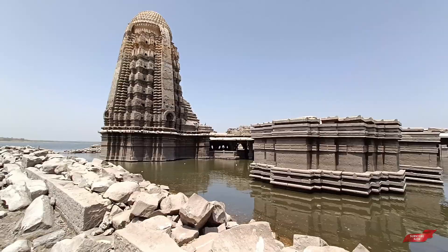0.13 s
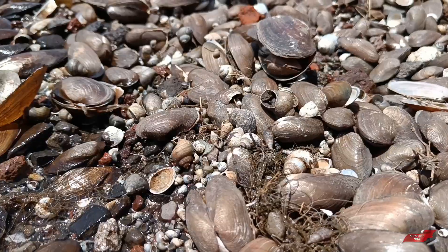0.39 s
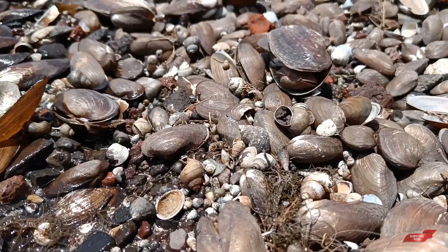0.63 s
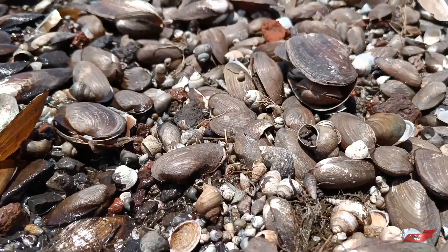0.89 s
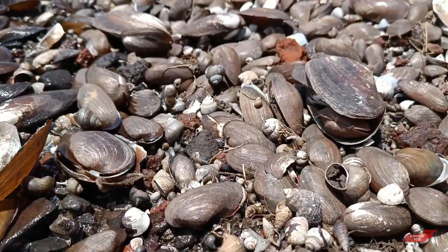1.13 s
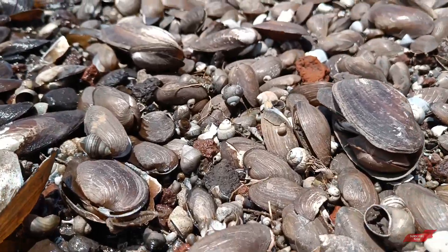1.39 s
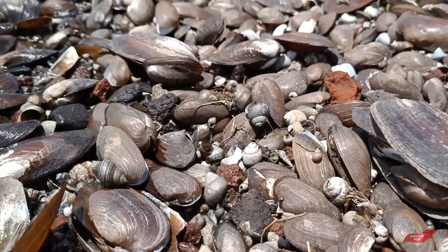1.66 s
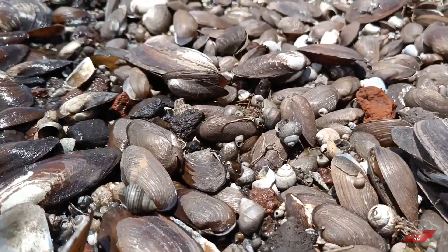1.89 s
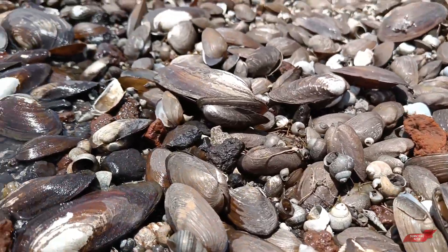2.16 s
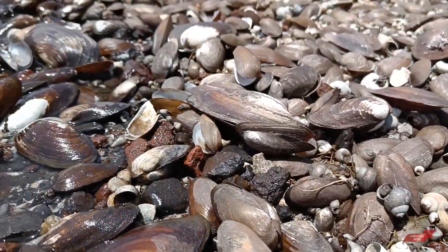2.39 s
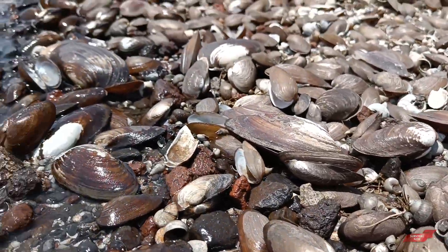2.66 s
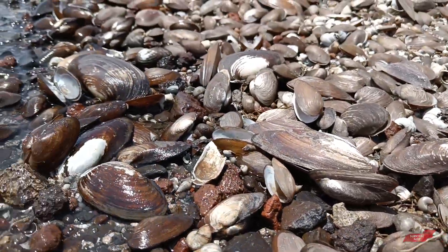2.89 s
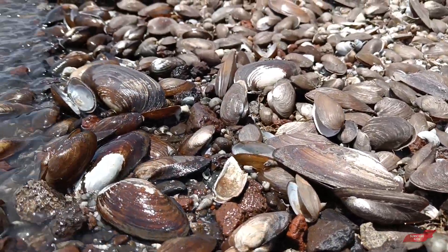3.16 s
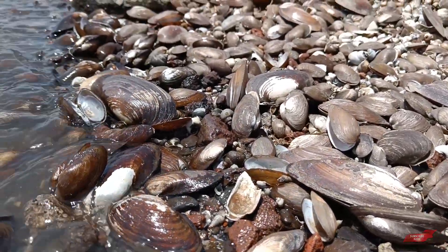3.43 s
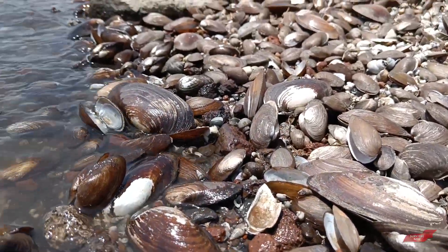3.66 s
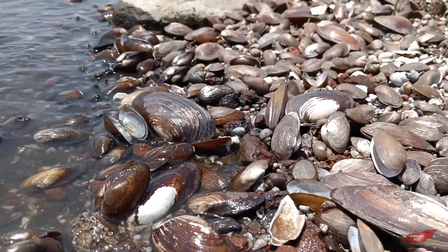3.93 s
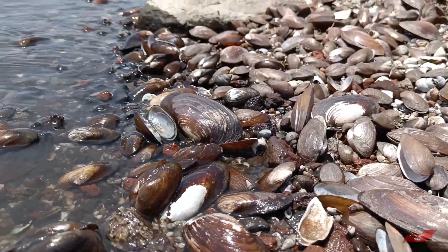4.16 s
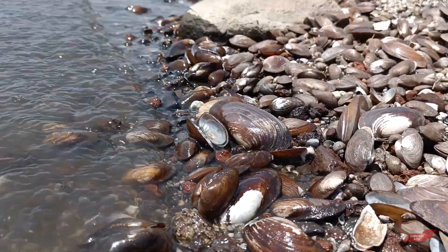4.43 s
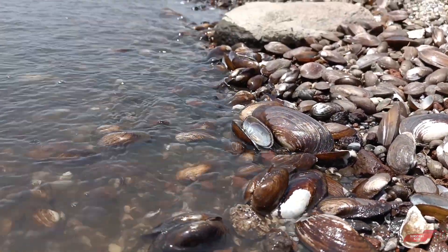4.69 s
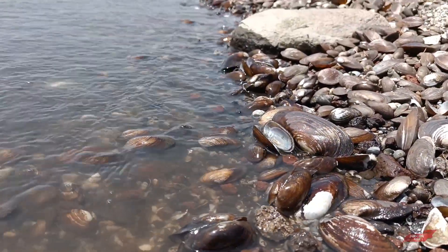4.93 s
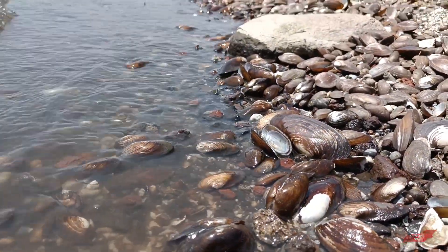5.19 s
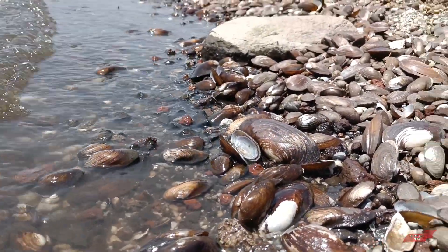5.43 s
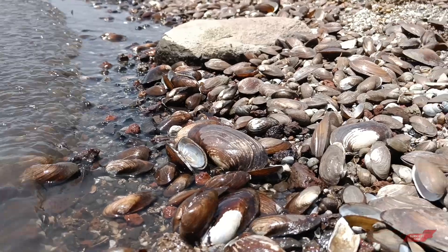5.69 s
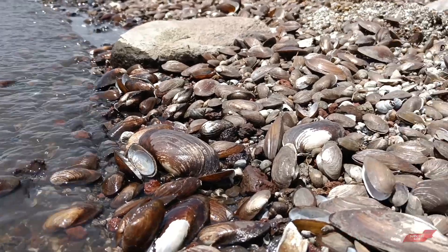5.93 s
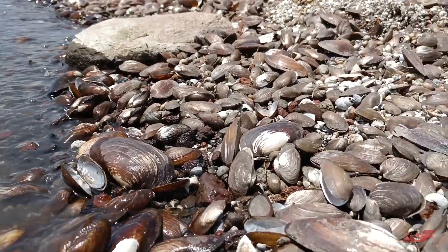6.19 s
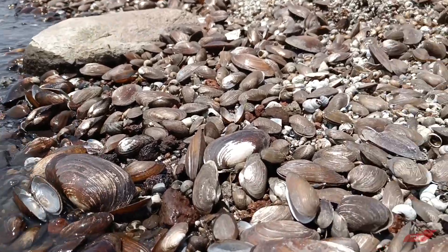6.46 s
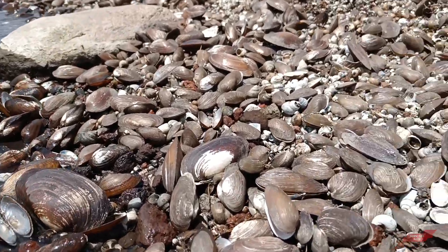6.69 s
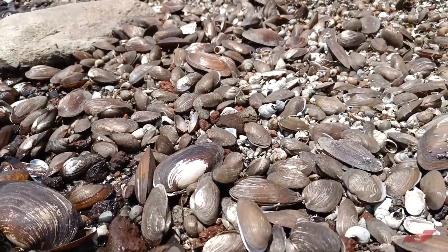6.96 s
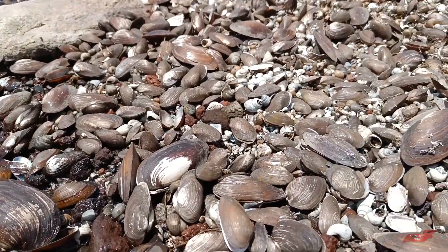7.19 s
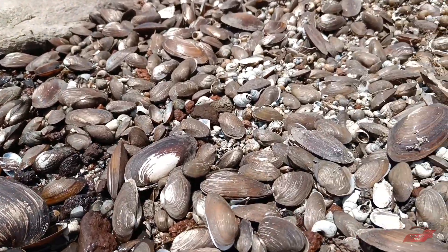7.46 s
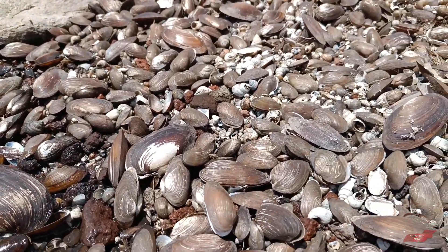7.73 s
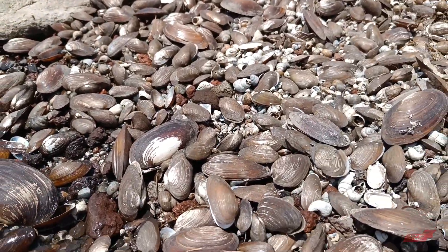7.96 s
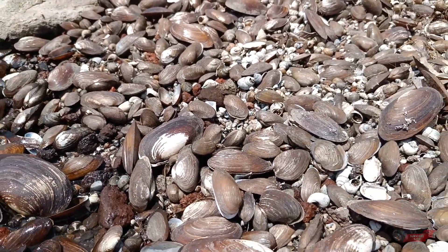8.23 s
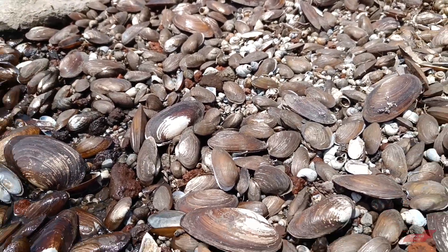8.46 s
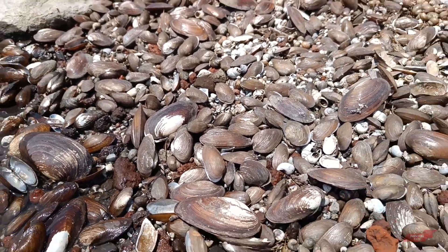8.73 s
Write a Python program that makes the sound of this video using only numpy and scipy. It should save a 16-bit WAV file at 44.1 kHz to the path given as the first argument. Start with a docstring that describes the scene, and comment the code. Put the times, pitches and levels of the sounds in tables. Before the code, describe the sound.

Close shallow water trickles, plinks and fizzes among shells on a lake shore, with wind buffeting the microphone, heaviest midway through.

```python
"""Lake shore, at the waterline: a hand-held microphone with two ports, close above heaps of shells.
Small waves wash over the shells; ringing sines make the bubbles that plink and gurgle in the gaps.
Foam crackles in short noise bursts and hisses in coloured noise as the water drains.
Gusts buffet each port on its own with lumpy low noise and hard puffs.
Behind lie a low patchy shore noise and one faint far chirp of narrow-band noise."""
import sys
import numpy as np
from scipy import signal
from scipy.fft import rfft, irfft, next_fast_len
from scipy.io import wavfile

SR = 44100
rng = np.random.default_rng(int(sys.argv[2]) if len(sys.argv) > 2 else 0)


def to_wav(s):
    """Save 16-bit WAV."""
    ch = np.atleast_2d(s).T  # columns
    pcm = np.round(np.clip(ch, -1, 1) * 32767)  # PCM
    wavfile.write(sys.argv[1], SR, pcm.astype(np.int16))


def how_loud(loudness_db):
    """Turn decibels into a plain amplitude multiplier (0 dB gives 1, 20 dB gives 10)."""
    steps = np.asarray(loudness_db, float) / 20
    return 10 ** steps


N = 390285  # length in samples


# Colour of the wash at the waterline. Each row: frequency in Hz, relative density in dB per Hz.
WASH_COLOUR = [(290, -67.5), (500, -19), (632, -16.5), (764, -16), (1950, -1), (3200, -10.5), (6500, -7),
               (7700, -19), (9500, -24.5), (12500, -20.5), (15000, -20), (15750, 0.5), (16500, -61.5)]


def water():
    """Each wave gurgles, fizzes and sprays: bubbles among shells over a noisy sheet of water and foam."""
    gurgle_db, fizz_db, spray_db = wave_levels()
    # still water leaves only a smooth hiss: the bubbles fade faster than it does
    busy_db = 0.55 * np.minimum(gurgle_db + 60, 0)
    gurgle = swarm(gurgle_db + busy_db, low_hz=542, high_hz=3420, trim_db=4.0,
                   count=4500, cycles=18, spread_db=5, lean=0.8, size=1100)
    fizz = swarm(fizz_db + busy_db, low_hz=3137, high_hz=7170, trim_db=10.5,
                 count=5000, cycles=20, spread_db=3.5, lean=1.3, size=400)
    bubbling = among_shells(gurgle + fizz + plinks())
    return bubbling + sheet(gurgle_db, fizz_db, spray_db, busy_db) + snaps(spray_db)


def sheet(gurgle_db, fizz_db, spray_db, busy_db):
    """Water running over the shells: patchy noise in three bands that follow gurgle, fizz and spray."""
    wash = hiss(WASH_COLOUR, alike=0.35, patchy_db=1.8)
    low = rms_one(band(wash, 500, 3000, order=1))
    middle = rms_one(band(wash, 2900, 7400, order=3))
    top = rms_one(band(wash, 7600, 18000, order=3))
    # in busy water the bubbles carry most of the gurgle
    under_db = gurgle_db - 10.5 - 0.3 * np.maximum(busy_db, -7)
    return how_loud(under_db) * low - how_loud(fizz_db - 9.5) * middle + how_loud(spray_db + 1.5) * top


# The waves. Each row: arrival in seconds, hold in seconds, then the nominal levels in dB of
# gurgle, fizz and spray.
WAVES_ARRIVING = [(0.123, .04, -63, -81, -83.5), (0.479, .29, -54.5, -60.5, -79.5),
                  (0.817, .09, -59.5, -64.5, -71.5), (1.066, .02, -65, -74, -73.5),
                  (1.479, .08, -56.5, -68.5, -79), (1.79, .06, -50, -66, -80.5),
                  (1.918, .03, -57, -65.5, -78.5), (2.031, .07, -57, -70.5, -88),
                  (2.955, .03, -68, -59, -82), (3.258, .23, -56, -60.5, -68), (3.921, .03, -58, -64, -69.5),
                  (4.184, .02, -54, -75.5, -100), (4.348, .02, -59, -71.5, -82.5),
                  (4.579, .22, -50, -57, -63.5), (4.886, .28, -45, -56, -61.5),
                  (5.347, .04, -55, -58.5, -61), (5.98, .75, -44, -52, -58.5),
                  (6.861, .05, -53, -59, -61.5), (7.721, .02, -56, -58.5, -69.5),
                  (7.898, .17, -56, -62, -67), (8.224, .3, -56, -65.5, -66),
                  (8.757, .03, -50, -55.5, -68.5)]
# in the order gurgle, fizz, spray: swell and ebb (dB per s), still water (dB)
SWELL_DB_PER_S, EBB_DB_PER_S, STILL_DB = (200, 220, 113.5), (125, 121.5, 114), (-70.5, -85.5, -85.5)
# the slow drain each wave leaves: start below the crest (dB), fading (dB per s)
DRAIN_DB, DRAIN_DB_PER_S = (-22, -16, -5.5), (11, 14.5, 18.5)


def wave_levels():
    """Level of gurgle, fizz and spray: every wave swells, holds, ebbs and drains over still water."""
    levels = []
    for k in range(3):
        swell = SWELL_DB_PER_S[k]
        gains = [how_loud(STILL_DB[k]) * peaked(0, 0, 0, 0)]
        for start, hold, *db in WAVES_ARRIVING:
            crest = peaked(start, hold, swell, EBB_DB_PER_S[k])
            drain = peaked(start, hold, swell, DRAIN_DB_PER_S[k])
            gains.append(how_loud(db[k]) * crest)
            gains.append(how_loud(db[k] + DRAIN_DB[k]) * drain)
        levels.append(summed_db(gains))
    return levels


# Single bubbles close by. Each row: start in seconds, nominal level in dB, pitch in Hz,
# length in seconds (the ring is held to 5-35 ms).
CLEAR_BUBBLES = [(0.09, -37.5, 754, 0.013), (0.175, -47, 1050, 0.016), (0.386, -47, 2480, 0.0067),
                 (0.498, -33.5, 2100, 0.007), (0.548, -48, 532, 0.038), (0.573, -47.5, 1770, 0.021),
                 (0.574, -41, 682, 0.037), (0.614, -41.5, 1360, 0.01), (0.705, -29, 2055, 0.004),
                 (0.736, -31.5, 620, 0.011), (0.755, -26.5, 2400, 0.0065), (0.939, -36.5, 2040, 0.008),
                 (1.084, -35.5, 3080, 0.0056), (1.237, -49.5, 980, 0.025), (1.443, -51, 2300, 0.03),
                 (1.466, -28, 2110, 0.0041), (1.521, -25.5, 1920, 0.0069), (1.583, -45, 2160, 0.012),
                 (1.76, -37, 1360, 0.0088), (1.798, -28.5, 2200, 0.0042), (1.803, -29.5, 1600, .0072),
                 (1.848, -28, 1384, 0.01), (1.93, -31, 1060, 0.0092), (2.051, -38.5, 755, 0.011),
                 (2.092, -50, 1850, 0.0061), (2.16, -34, 2090, 0.0048), (3.167, -34, 580, 0.017),
                 (3.204, -44.5, 1160, 0.023), (3.578, -44.5, 3220, .007), (3.254, -37, 2110, 0.0063),
                 (3.31, -39, 2180, .008), (3.385, -33.5, 1800, 0.0084), (3.447, -39, 1850, .008),
                 (3.455, -46, 2180, .009), (3.548, -28, 2046, 0.0036), (3.712, -43.5, 1745, 0.015),
                 (3.751, -38, 2280, 0.0043), (3.881, -35.5, 1206, 0.013), (3.955, -35.5, 1154, 0.0224),
                 (4.173, -24, 1244, 0.0091), (4.303, -42.5, 1736, 0.011), (4.467, -51, 964, 0.038),
                 (4.562, -38.5, 4260, 0.0077), (4.594, -35, 1730, .006), (4.625, -32.5, 2020, 0.013),
                 (4.658, -39.5, 1030, 0.013), (4.721, -36, 1740, 0.0079), (4.768, -24.5, 2420, 0.0045),
                 (4.83, -35, 2550, 0.007), (4.875, -28.5, 2740, 0.0032), (4.893, -31, 2080, 0.0062),
                 (5.055, -27, 1270, .008), (5.082, -30.5, 1550, 0.015), (5.153, -16.5, 2067, 0.0082),
                 (5.286, -35, 1013, .012), (5.35, -26, 1430, 0.0064), (5.495, -38, 1150, 0.011),
                 (5.535, -45.5, 2525, 0.012), (5.86, -44, 997, 0.032), (6.066, -31.5, 3000, 0.0059),
                 (6.303, -35, 1880, .012), (6.43, -37, 1177, .02), (6.498, -39, 985, 0.054),
                 (6.582, -24, 1690, 0.0073), (6.592, -27, 1106, 0.01), (6.756, -20, 1310, 0.0068),
                 (6.769, -24.5, 1590, 0.0093), (6.786, -30, 1270, 0.0071), (6.861, -34.5, 1220, 0.014),
                 (6.859, -32, 1700, 0.021), (6.867, -27.5, 1990, 0.0045), (6.95, -26.5, 2030, 0.0045),
                 (7.681, -35.5, 1050, 0.013), (7.747, -31, 722, 0.011), (7.848, -31.5, 2420, 0.0019),
                 (7.856, -36, 846, 0.014), (7.926, -37, 1556, 0.012), (7.982, -41, 1940, 0.0097),
                 (8.143, -38.5, 1850, 0.0055), (8.371, -41, 2720, 0.0056), (8.455, -47, 774, 0.018),
                 (8.473, -42.5, 1880, .008), (8.508, -32.5, 2620, 0.0032), (8.513, -51, 649, 0.026),
                 (8.757, -37.5, 1860, 0.012)]


def plinks():
    """Clear single bubbles; one that lives longer climbs further in pitch."""
    s, db, hz, length = np.transpose(CLEAR_BUBBLES)
    return bubbles(s, db, hz, np.clip(length, 0.005, 0.035), 5 * length, size=2000, lean_db=1.5)


def swarm(level_db, count, low_hz, high_hz, cycles, spread_db, lean, size, trim_db):
    """Random clumped bubbles, more and stronger in louder water; lean under 1 favours small, high ones."""
    draw = rng.random((count, 5))
    crowd = how_loud(0.6 * level_db)
    # spread the births evenly over the running share of crowding
    share = np.cumsum(crowd * how_loud(6.0 * drift(16)))
    s = np.interp((np.arange(count) + draw[:, 0]) / count, share / share[-1], np.arange(N) / SR)
    at = (s * SR).astype(int)
    crowd_db = 10 * np.log10(crowd / np.mean(crowd))
    db = (level_db - crowd_db)[at] + trim_db - spread_db * np.log(draw[:, 1] + 0.17)
    hz = low_hz * (high_hz / low_hz) ** draw[:, 2] ** lean
    # bubbles born together are of a size
    hz = hz * 2 ** (0.2 * drift(9)[at])
    length = cycles * (0.3 + 1.6 * draw[:, 3] ** 2) / hz
    rise = 0.5 * draw[:, 4] - 0.18
    return bubbles(s, db + at_hz(WASH_COLOUR, hz), hz, length, rise, size, lean_db=7)


def bubbles(s, db, hz, length, rise, size, lean_db):
    """Each bubble rings as a dying sine that glides by its rise; each has its own bearing."""
    lag_spread_s = 0.00008
    bearing = rng.standard_normal((len(s), 2))
    out = np.zeros((2, N + 2 * size))
    at = (np.clip(s, 0, N / SR) * SR).astype(int)[:, None] + np.arange(size)
    for side in (0, 1):
        lag = lag_spread_s * np.maximum((1 - 2 * side) * bearing[:, :1], 0)
        t = np.maximum(np.arange(size) / SR - lag, 0)
        life = t / length[:, None]
        phase = 2 * np.pi * hz[:, None] * t * (1 + rise[:, None] * life ** 2 / 3)
        swell = 1 - np.exp(-t * hz[:, None] / 2.6)
        fade = np.exp(-1.2 * life - life ** 4)
        gain = how_loud(db)[:, None] * 2 / (1 + how_loud((2 - 4.9 * side) * lean_db * bearing[:, 1:]))
        ring = gain * swell * fade * np.sin(phase)
        out[side] = np.bincount(at.ravel(), ring.ravel(), N + 2 * size)
    return out[:, :N]


def among_shells(x):
    """The hollow shells scatter each bubble into a short rough tail."""
    scatter_db, scatter_s = -9.5, 0.0049
    t = np.arange(2000) / SR
    tail = rng.standard_normal((2, len(t))) * np.exp(-t / scatter_s) * (t > 0.002)
    tail = how_loud(scatter_db) * tail / np.sqrt(np.sum(tail ** 2, axis=1, keepdims=True))
    return x + signal.fftconvolve(x, tail, axes=1)[:, :N]


# Thin films snapping close by, treble only. Each row: time in seconds, relative level in dB.
FILM_TICKS = [(0.7156, -41), (0.8044, -40.5), (0.8582, -34.5), (0.8775, -42), (0.915, -45), (3.492, -33.5),
              (3.618, -32), (4.469, -38), (4.6612, -33), (4.7312, -31.5), (4.8732, -23), (5.0567, -31),
              (6.0758, -34.5), (6.465, -38), (6.6753, -41.5), (7.237, -38), (7.9201, -30), (8.6302, -34)]
# Foam cells bursting close by. Each row: time in seconds, relative level in dB, pitch in Hz.
FOAM_POPS = [(0.8031, -31.5, 6600), (2.872, -46.5, 6950), (2.945, -49.5, 5420), (2.966, -32, 6900),
             (3.041, -28, 5830), (3.38, -45, 5000), (3.402, -33.5, 6300), (3.486, -30.5, 3720),
             (3.7798, -41, 7200), (3.93, -29.5, 3800), (4.0088, -36, 4130), (4.1736, -36, 3700),
             (4.381, -33.5, 6070), (4.682, -30, 6750), (4.832, -31, 6200), (4.8744, -32, 5730),
             (5.0046, -31.5, 6310), (5.1403, -43.5, 5530), (5.157, -31, 6800), (5.3446, -31.5, 5700),
             (5.477, -39, 5500), (5.751, -33, 4250), (6.675, -23.5, 4030), (6.726, -24, 4900),
             (6.7997, -25.5, 5960), (7.826, -31.5, 4100), (7.922, -25.5, 6050), (8.0292, -28, 4040),
             (8.304, -32.5, 3820)]


def snaps(spray_db):
    """Foam films snap as noise clicks, in random clumps and close by; thinner films click higher."""
    draw = rng.random((3, N))
    # on average 45 a second before clumping
    struck = draw[0] < 45 * how_loud(8.0 * drift(9)) / SR
    clicks = struck * how_loud(spray_db + 37.5 - 4.4 * np.log(draw[1] + 0.037))
    thin = clicks * (draw[2] < 0.88) * how_loud(-12.0)
    middling = clicks * (draw[2] >= 0.9) * how_loud(-3.5)
    broad = np.zeros(N)
    s, db = np.transpose(FILM_TICKS)
    thin[(s * SR).astype(int)] = how_loud(db + 15.0)
    s, db, hz = np.transpose(FOAM_POPS)
    broad[(s * SR).astype(int)] = how_loud(db + 2.5)
    # each pop also rings at its pitch
    out = bubbles(s, db - 7, hz, 16 / hz, 0 * s, size=400, lean_db=2)
    for train, low_hz, high_hz in ((broad, 3500, 8500), (middling, 4800, 17000), (thin, 10000, 17000)):
        # each snap is a few milliseconds of noise
        decay = signal.lfilter([1], [1, -0.988], train + 1e-18)
        burst = rng.standard_normal((2, N)) * decay
        coloured = band(shaped(burst, WASH_COLOUR), low_hz, high_hz, order=3)
        out = out + coloured * np.sqrt(2 * np.sum(train ** 2) / np.sum(coloured ** 2))
    return out


# Slaps of water on the shells. Each row: start in seconds, nominal level in dB, top in Hz.
SHELL_SLAPS = [(0.496, -41, 6270), (1.805, -48, 6500), (1.851, -52, 2870), (4.375, -33.5, 1820),
               (4.772, -37, 4600), (6.757, -44, 3270), (8.757, -29, 5600)]


def knock():
    """Water slaps a shell: a few milliseconds of broad dying noise."""
    t, out = np.arange(2000) / SR, np.zeros(N + 2000)
    for s, db, top_hz in SHELL_SLAPS:
        slap = band(rng.standard_normal(len(t)) * np.exp(-t / 0.007), 300, top_hz)
        out[int(s * SR):int(s * SR) + len(t)] += how_loud(db) * slap
    return out[:N]


def wind():
    """Eddies press on each port: lumpy low noise whose centre moves up as it gets stronger."""
    out = []
    for port_db in wind_levels():
        lumps_db = 2.0 * drift(36.0) + 2.55 * drift(64)
        white = rng.standard_normal((3, N))
        deep = rms_one(band(band(white[0], 23.0, 105.0), 39.8, 126.4))
        body = rms_one(band(band(white[1], 65.6, 171.8), 85.0, 193))
        high = rms_one(band(band(white[2], 182, 300), 110, 616, order=3))
        strength_db = port_db + 20
        mix = how_loud(-1.5 - 0.25 * strength_db) * deep + body + how_loud(-10.5 + 1.15 * strength_db) * high
        out.append(how_loud(port_db + lumps_db - 4.0) * mix)
    return np.array(out)


# Slow breeze, rising and falling at each port. Each row: time in seconds, nominal level in dB at
# the left port, then at the right.
SLOW_BREEZE = [(0.0, -51, -45.5), (0.25, -46, -52), (0.66, -72.5, -74), (1.0, -56, -45), (1.6, -54, -86),
               (2.3, -58.5, -51), (2.9, -59, -78), (3.7, -57.5, -51.5), (4.3, -72, -101), (5.0, -81, -67),
               (6.099, -67, -73), (6.701, -60.5, -68), (7.15, -102, -89.5), (7.626, -67.5, -70.5),
               (8.4, -78, -76), (8.85, -46, -47)]
# Gusts, most of them leaning on one port. Each row: peak in seconds, nominal level in dB,
# left minus right in dB, length in seconds.
WIND_GUSTS = [(1.083, -27, -15, 0.032), (1.276, -46, -19, 0.37), (1.384, -31.5, 32, 0.048),
              (1.481, -40.5, -5.5, 0.066), (1.59, -17, -40, 0.016), (1.656, -26, -28, 0.077),
              (1.796, -28, -35, 0.026), (1.913, -39.5, 28, 0.082), (1.978, -17, -23, 0.047),
              (2.099, -34.5, 9, 0.1), (2.678, -36, -34, 0.19), (3.086, -39.5, -6, 0.12),
              (3.299, -28, -2, 0.1), (3.531, -22.5, 30, 0.019), (3.986, -32, -5.5, 0.056),
              (4.071, -34, -26, 0.04), (4.331, -38.5, -20, 0.078), (4.433, -33, 9, 0.076),
              (4.61, -37.5, -25, 0.028), (4.761, -28, 45, 0.034), (4.859, -22.5, 36, 0.066),
              (4.995, -12, 47, 0.06), (5.197, -11.5, 42, 0.068), (5.267, -11.5, 59, 0.079),
              (5.36, -9, 56, 0.046), (5.418, -11, 53, 0.13), (5.502, -22.5, -24, 0.061),
              (5.561, -23, 21, 0.048), (5.737, -28, -16, 0.033), (5.789, -23, 49, 0.036),
              (5.938, -17, 36, 0.075), (6.105, -10, 58, 0.053), (6.411, -36.5, -10, 0.056),
              (6.528, -46.5, 2, 0.13), (6.927, -28.5, 48, 0.055), (7.299, -55, 12, 0.11),
              (8, -51, 31, 0.46), (8.26, -42, -8.5, 0.09), (8.635, -30, -43, 0.13),
              (8.786, -24.5, -57.5, 0.14)]
# a gust is this many dB down one length before and one length after its peak
GUST_RISE_DB, GUST_FALL_DB = 23, 26


def wind_levels():
    """Level at each port: the breeze plus every gust, weaker on the sheltered side."""
    levels = []
    for side, breeze_db in zip((1, -1), in_time(SLOW_BREEZE)):
        gains = [how_loud(breeze_db[::64])]
        for s, db, lean_db, length in WIND_GUSTS:
            shape = peaked(s, 0, GUST_RISE_DB / length, GUST_FALL_DB / length)
            gains.append(how_loud(db + min(side * lean_db, 0)) * shape)
        levels.append(summed_db(gains))
    return levels


# Single hard puffs. Each row: time in seconds (strongest about 12 ms later), nominal level in dB
# shared between the ports.
HARD_PUFFS = [(1.575, -18), (1.974, -19), (2.645, -29), (4.057, -17), (4.746, -20), (4.986, -12),
              (5.191, 0), (5.249, -2.5), (5.842, -17), (6.069, -4.5)]


def puffs():
    """A hard eddy: a brief low pressure swing, mostly on the port that faces the wind."""
    s, db = np.transpose(HARD_PUFFS)
    left_db, right_db = wind_levels()
    lean = (left_db - right_db)[((s + 0.015) * SR).astype(int)]
    draw = rng.random((len(s), 2))
    t, out = np.arange(-900, 900) / SR, np.zeros((2, N + 2000))
    for start, level_db, lean_db, (pitch, turn) in zip(s, db, lean, draw):
        # 90-150 Hz under a bell-shaped envelope
        swing = np.exp(-(t / 0.0055) ** 2) * np.sin(2 * np.pi * ((90 + 60 * pitch) * t + turn))
        ports = how_loud(level_db - 10 * np.log10(1 + how_loud(-2 * lean_db * np.array([[1], [-1]]))))
        at = int((start - 0.008) * SR)
        out[:, at:at + len(t)] += ports * swing
    return out[:, :N]


# Colour of the shore behind. Each row: frequency in Hz, relative density in dB per Hz.
SHORE_COLOUR = [(120, -41.5), (200, 5), (446, 2.5), (610, 1.5), (1400, -11.5), (4000, -28), (8800, -49)]


def shore():
    """Low patchy noise of the shore, nearly independent at the two ports."""
    # the shore is quieter until the listener is down at the waterline
    near_db = np.interp(np.arange(N) / SR, [0.42, 0.45], [-7.0, 0])
    return how_loud(-67.5 + near_db) * hiss(SHORE_COLOUR, alike=0.036, patchy_db=2.0)


# A faint far chirp. One row: start in seconds, end in seconds, pitch in Hz, nominal level in dB.
FAR_CHIRP = (1.35, 1.58, 3560, -68.5)


def chirp():
    """A thin, slightly rough high note: narrow-band noise with 22 ms ramps."""
    start, end, hz, db = FAR_CHIRP
    t = np.arange(N) / SR
    gate = np.clip(np.minimum(t - start, end - t) / 0.022, 0, 1)
    return how_loud(db) * gate * rms_one(band(rng.standard_normal(N), hz - 90, hz + 90))


def hiss(points, alike, patchy_db):
    """Coloured noise, part common to both ports, flickering in four ranges."""
    common, left, right = rng.standard_normal((3, N))
    alike = np.clip(alike, 0, 1)
    white = np.sqrt(alike) * common + np.sqrt(1 - alike) * np.array([left, right])
    pair = rms_one(shaped(white, points))
    shared, edges = drift(14), [150, 1200, 3500, 8000, 18000]
    out = 0
    for k in range(4):
        flicker = how_loud(patchy_db * (shared + drift(60)))
        # neighbouring ranges have opposite sign so that they add where they meet
        out = out + (-1) ** k * band(pair, *edges[k:k + 2]) * flicker
    return out


def peaked(start, hold, rise_db_per_s, fall_db_per_s):
    """Gain of one event, every 64 samples: climb to the start, hold, fall; straight lines in dB."""
    t = np.arange(0, N, 64) / SR - start
    return how_loud(rise_db_per_s * np.minimum(t, 0) - fall_db_per_s * np.maximum(t - hold, 0))


def summed_db(gains):
    """Level in dB of events that sound together (powers add), at every sample."""
    db = 10 * np.log10(np.sum(np.square(gains), axis=0) + 1e-20)
    return np.interp(np.arange(N), np.arange(0, N, 64), db)


def drift(rate_hz):
    """Slow chance: coarse noise through a double one-pole low-pass, scaled to unit rms."""
    # one value for every 40 samples; the first 2000 let the filter settle
    r = np.exp(-80 * np.pi * rate_hz / SR)
    slow = signal.lfilter([1], [1, -2 * r, r * r], rng.standard_normal(N // 40 + 2002))[2000:]
    return np.interp(np.arange(N) / 40, np.arange(len(slow)), rms_one(slow))


def shaped(x, points, behind=((0, 0), (1, 0))):
    """Colour a signal by a spectrum and turn its phase back."""
    size = next_fast_len(N)
    hz = np.arange(size // 2 + 1) * SR / size + 1
    turn = np.exp(-1j * np.interp(hz, *np.transpose(behind)))
    return irfft(rfft(x, size) * how_loud(at_hz(points, hz)) * turn, size)[..., :N]


def band(x, low_hz, high_hz, order=2):
    """Butterworth band-pass."""
    return signal.sosfilt(signal.butter(order, [low_hz, high_hz], "band", fs=SR, output="sos"), x)


def at_hz(points, hz):
    """Read a spectrum on a log-frequency axis."""
    point_hz, db = np.array(points)[:, 0], np.array(points)[:, 1]
    return np.interp(np.log(hz), np.log(point_hz), db)


def in_time(rows):
    """Table columns as signals."""
    s, *columns = np.transpose(rows)
    return [np.interp(np.arange(N) / SR, s, c) for c in columns]


def rms_one(x):
    """Scale to unit rms."""
    return x / np.sqrt(np.mean(x ** 2) + 1e-20)


# The ports hear the water unequally. Each row: frequency in Hz, left minus right in dB.
PORT_BALANCE = [(300, -1), (700, -0.5), (1300, -11), (1750, -6), (2070, -8.5), (2500, -12), (4400, -6),
                (8100, 4.5), (15000, -8)]
# The right port lags by about half a millisecond, most through its 2 kHz resonance; the lows run
# ahead. Each row: frequency in Hz, radians behind the left (negative is ahead).
RIGHT_PHASE = [(0, -3.5), (600, -0.94), (2070, 6.5), (16200, 49.5)]


def through_ports(air):
    """Each port colours the airborne sound by half the balance; the right one also turns its phase."""
    left = shaped(air[0], [(hz, db / 2) for hz, db in PORT_BALANCE])
    right = shaped(air[1], [(hz, -db / 2) for hz, db in PORT_BALANCE], RIGHT_PHASE)
    return np.array([left, right])


def scene():
    """Airborne sound is coloured by the two ports; wind acts on them directly."""
    air = water() + knock() + shore() + chirp()
    return through_ports(air) + wind() + puffs()


def roll_off(x):
    """The treble ends steeply here."""
    return signal.sosfilt(signal.butter(12, 16640, fs=SR, output="sos"), x)


def record(dry):
    """The microphone's peaks are rounded and the top is cut."""
    rounded = 1.01 * np.tanh(dry / 0.71)
    # 60 dB down from 16.3 kHz
    mix = signal.sosfilt(signal.cheby2(12, 60, 16300, fs=SR, output="sos"), rounded)
    return roll_off(mix)


dry = scene()
out = record(dry)
to_wav(out)
```